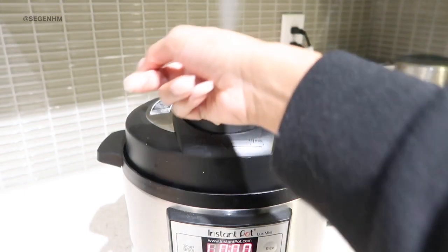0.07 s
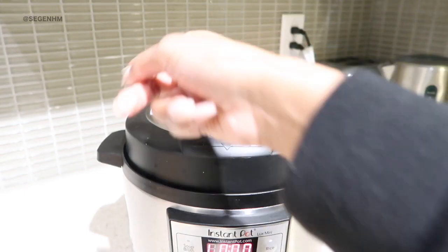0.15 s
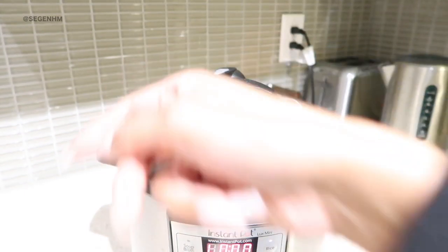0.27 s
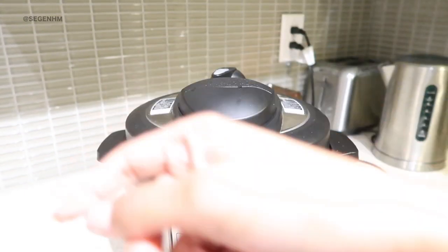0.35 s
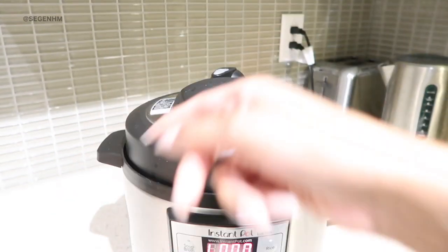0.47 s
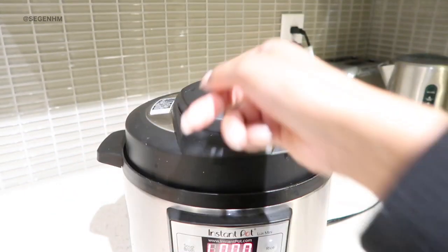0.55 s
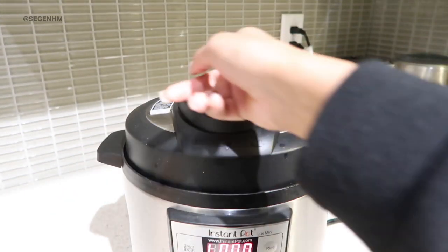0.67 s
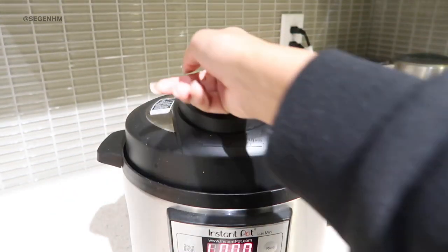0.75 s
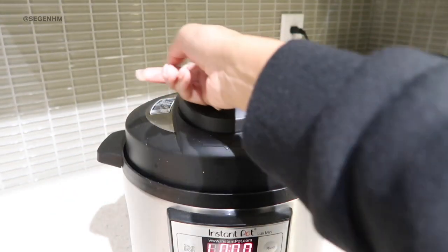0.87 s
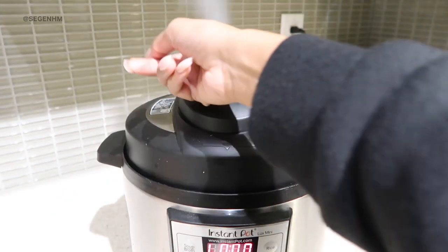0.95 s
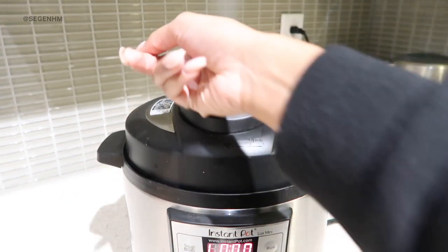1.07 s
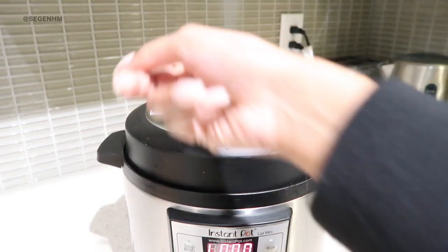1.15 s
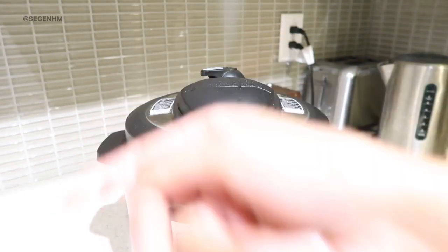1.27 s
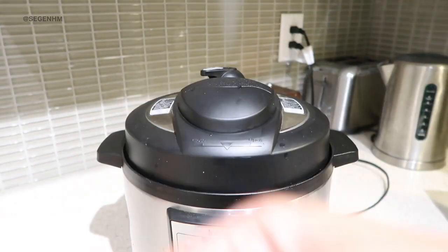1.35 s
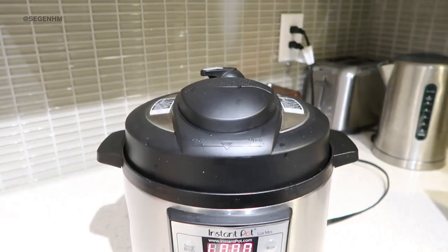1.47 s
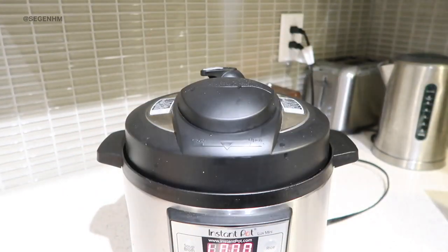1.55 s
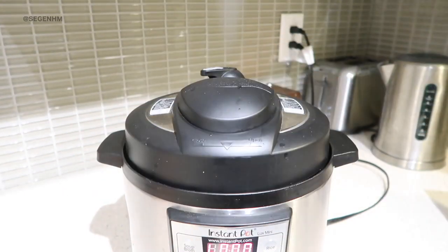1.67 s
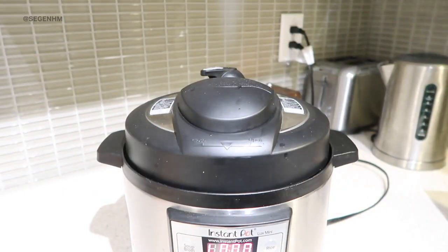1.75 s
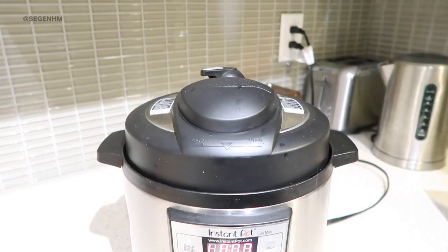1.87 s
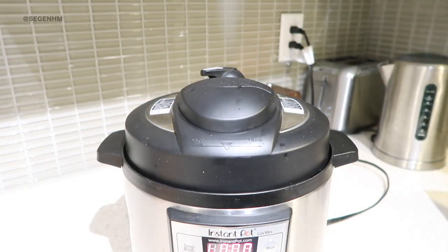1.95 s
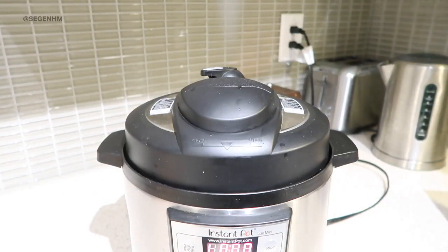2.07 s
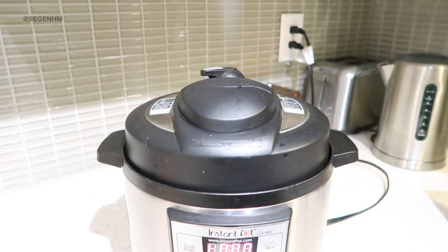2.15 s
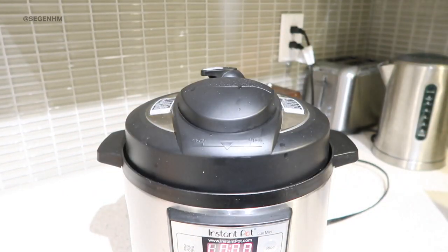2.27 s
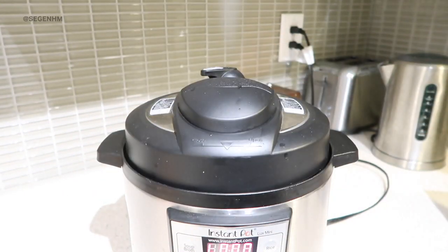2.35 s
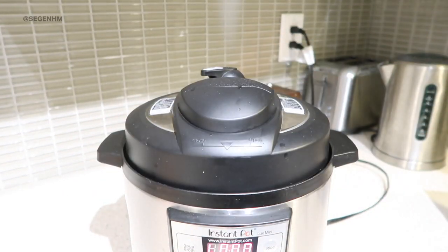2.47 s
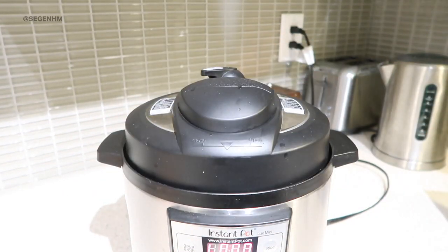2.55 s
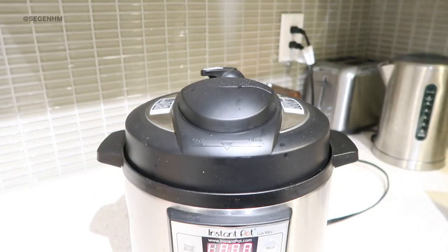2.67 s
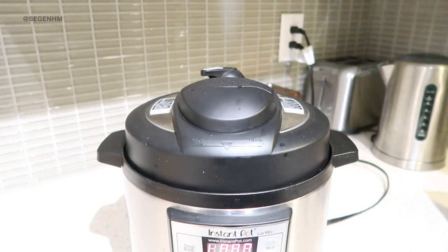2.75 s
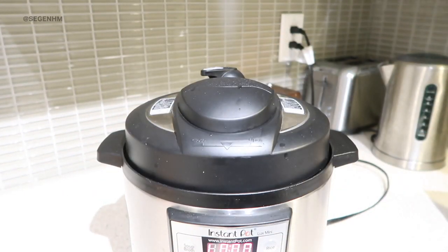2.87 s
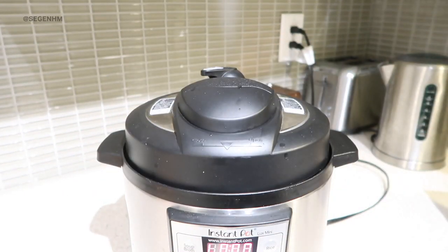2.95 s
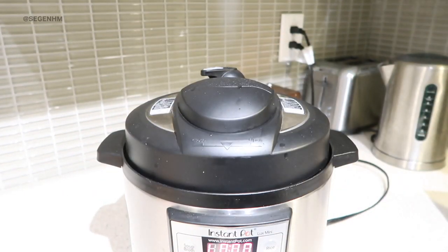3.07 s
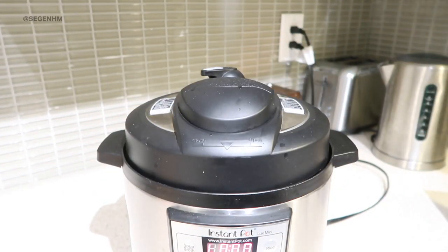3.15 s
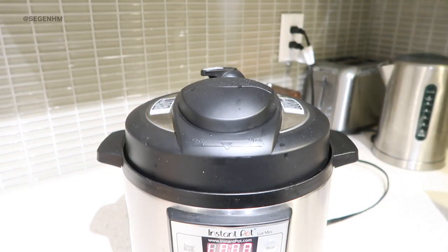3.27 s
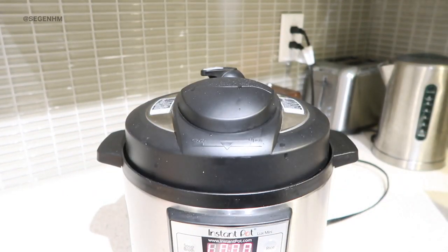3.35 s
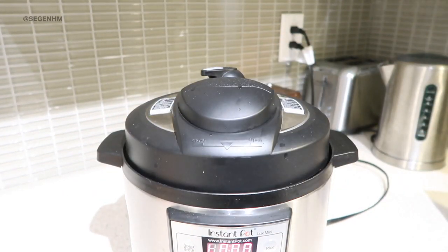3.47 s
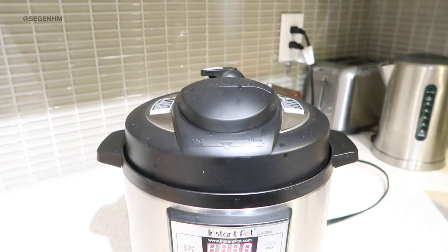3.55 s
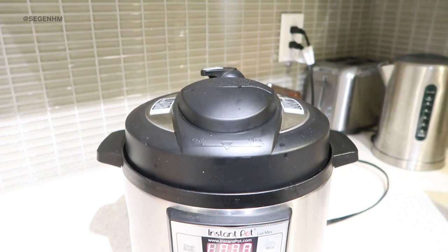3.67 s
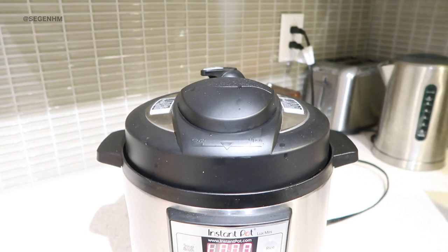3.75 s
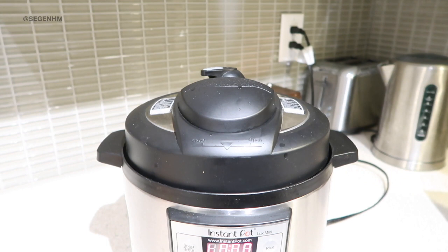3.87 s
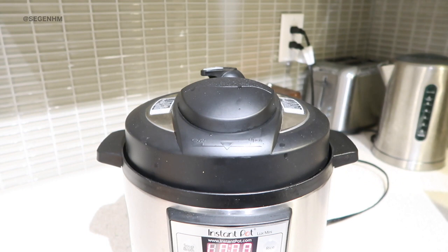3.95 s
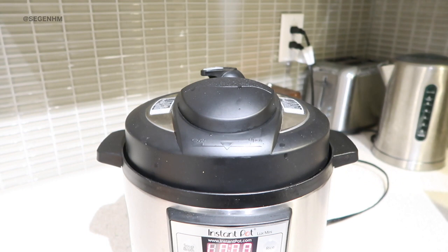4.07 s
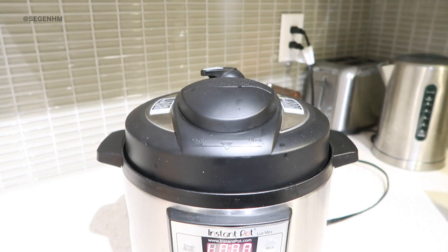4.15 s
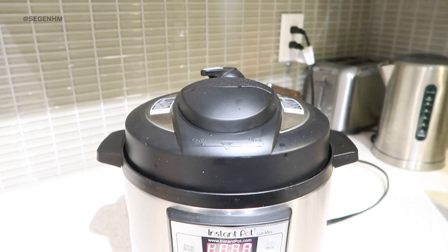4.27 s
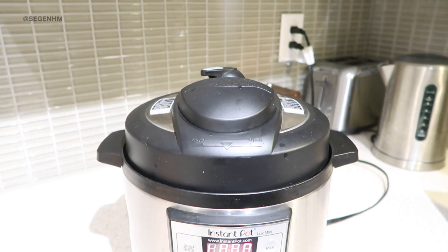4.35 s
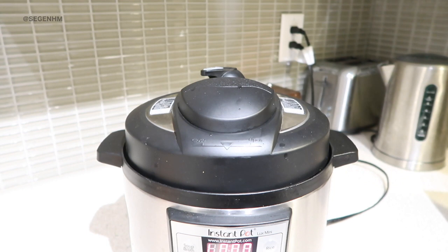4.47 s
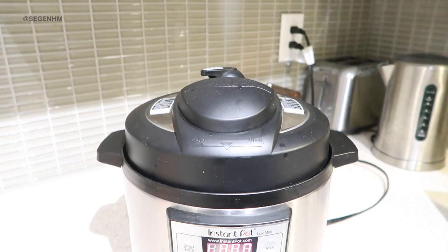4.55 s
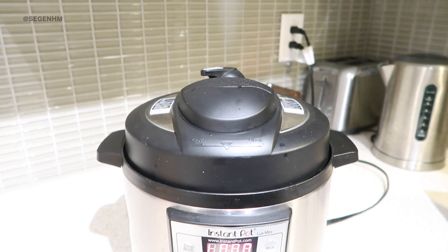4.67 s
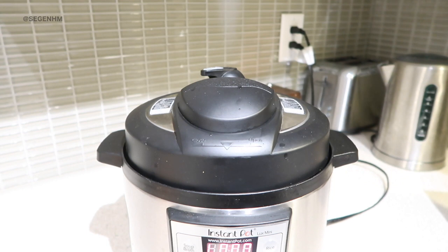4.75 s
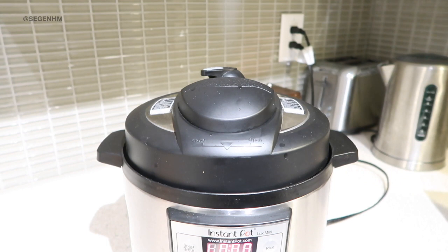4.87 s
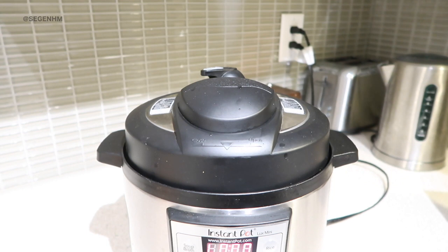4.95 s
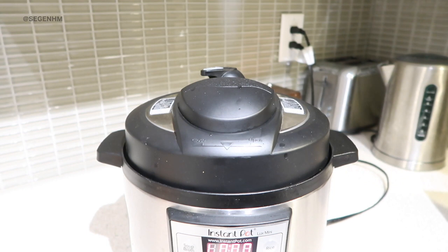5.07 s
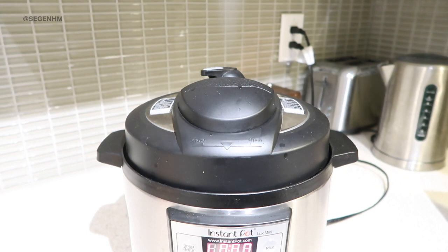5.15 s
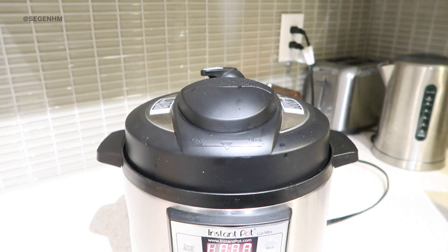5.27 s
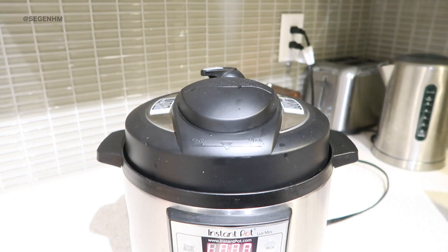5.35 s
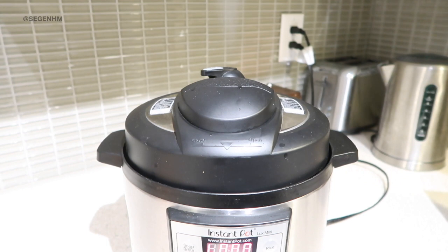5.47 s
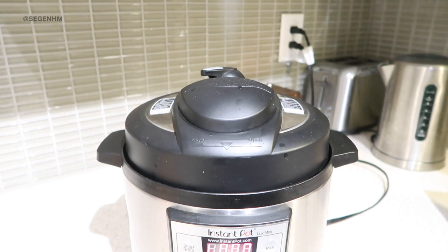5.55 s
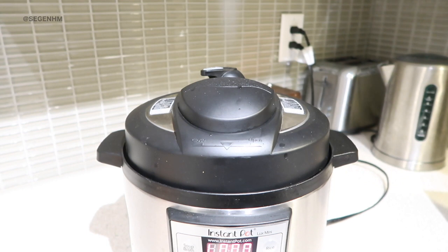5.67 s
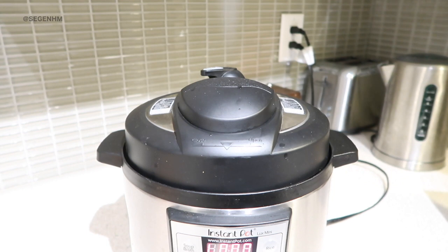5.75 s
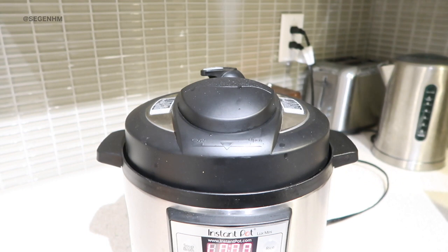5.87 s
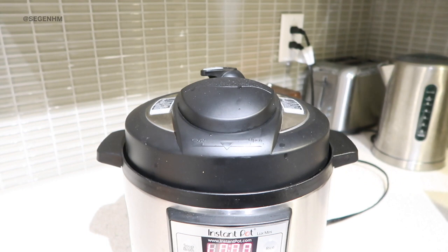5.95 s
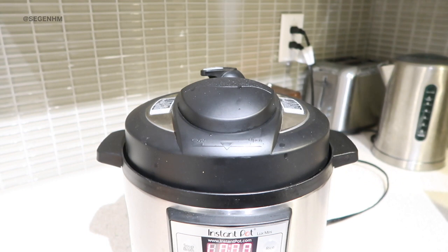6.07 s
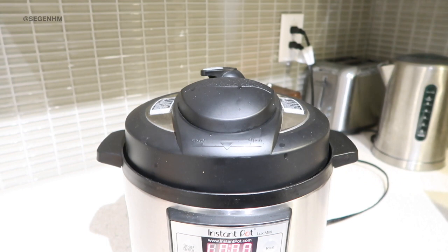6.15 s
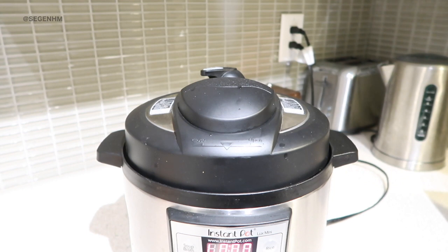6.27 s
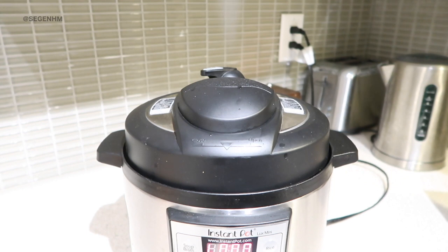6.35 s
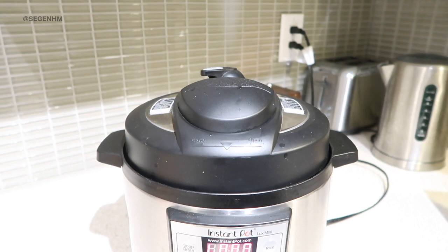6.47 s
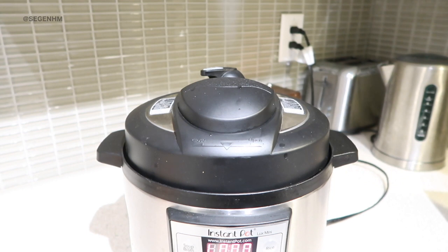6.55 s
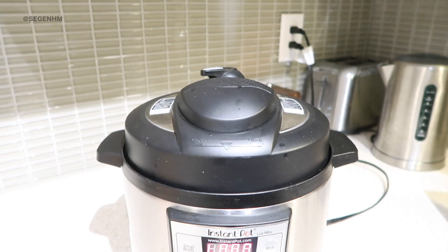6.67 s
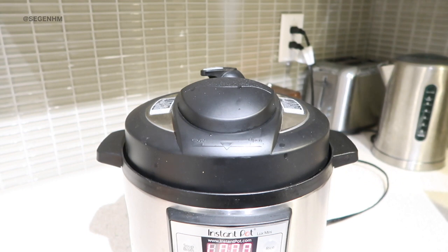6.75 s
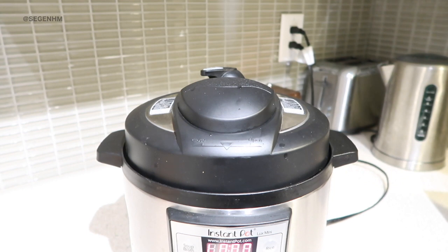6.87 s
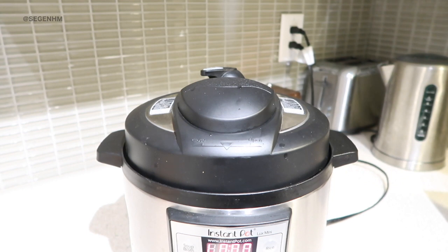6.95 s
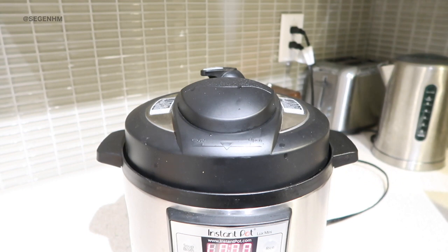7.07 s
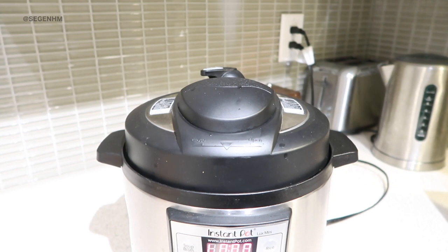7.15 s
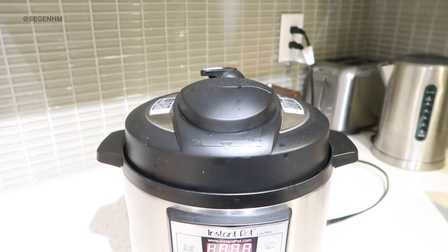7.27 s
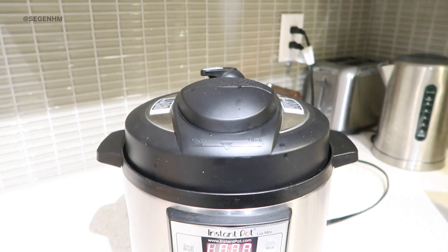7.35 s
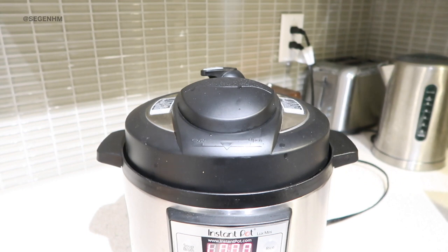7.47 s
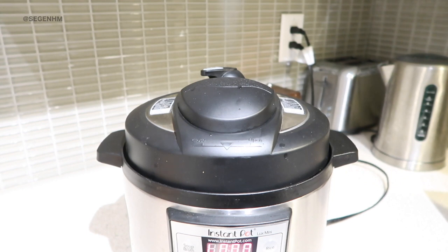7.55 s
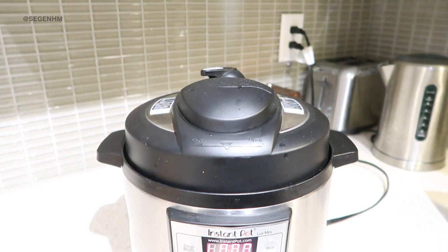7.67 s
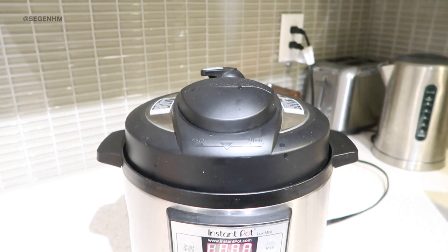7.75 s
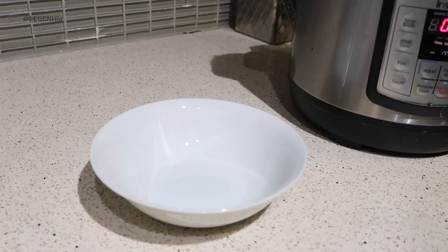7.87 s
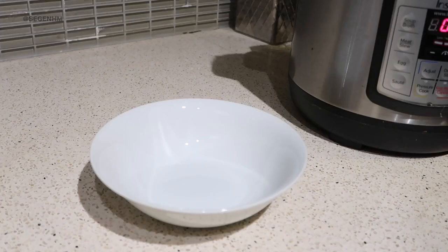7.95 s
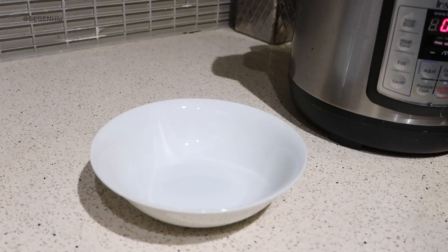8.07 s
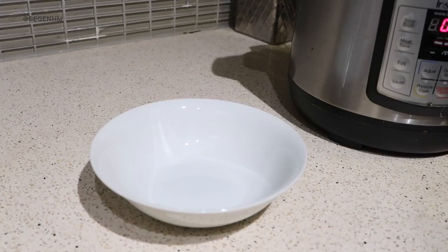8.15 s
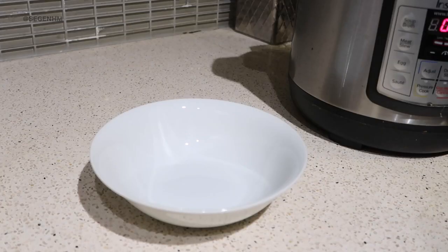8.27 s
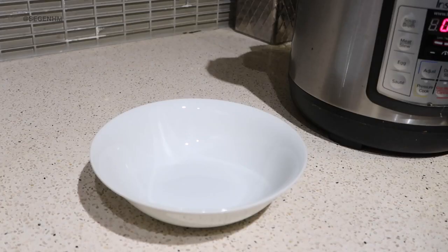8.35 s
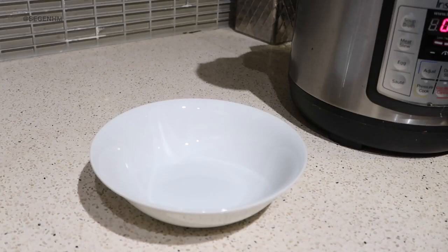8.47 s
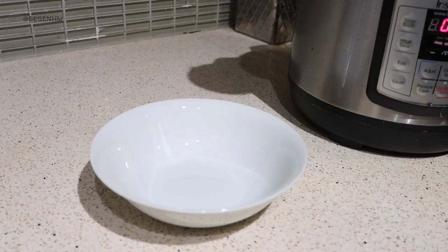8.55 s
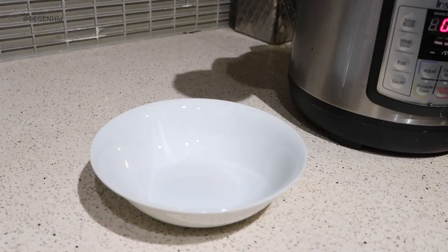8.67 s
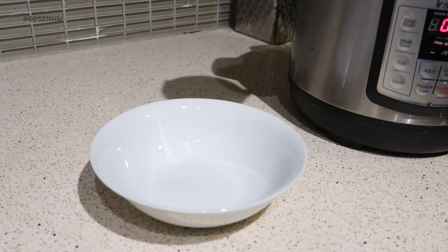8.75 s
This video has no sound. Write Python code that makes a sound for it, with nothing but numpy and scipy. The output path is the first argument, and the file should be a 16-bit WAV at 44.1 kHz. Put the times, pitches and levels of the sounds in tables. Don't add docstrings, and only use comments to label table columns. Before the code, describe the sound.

Close-up in a hard-surfaced kitchen: clicks and plastic taps, a short spluttering burst of steam falling shut, a small pause, then a hard clack and full pressure release. The jet sputters with condensed water at first, dries within moments and holds as a piercing, turbulent, evenly loud hiss for several seconds. It stops instantly at a scene change; low motor hum and faint room air remain.

```python
import sys
import numpy as np
from scipy import signal
from scipy.fft import rfft, irfft, next_fast_len
from scipy.io import wavfile

SR = 44100
rng = np.random.default_rng(int(sys.argv[2]) if len(sys.argv) > 2 else 0)


def undo_db(level):
    steps = np.asarray(level, float) / 20
    return 10 ** steps


def pcm_store(signal):
    levels = np.round(np.clip(np.atleast_2d(signal), -1, 1) * 32767)
    wavfile.write(sys.argv[1], SR, levels.astype(np.int16).T)


N = 388135
SCENE_CHANGE_S = 7.9063


def rms_one(x):
    return x / np.sqrt(np.mean(x ** 2) + 1e-20)


def white():
    return rfft(rng.standard_normal(next_fast_len(N)))


def coloured(noise, spectrum, peaks=(), peaks_db=0.):
    size = next_fast_len(N)
    hz = np.maximum(np.arange(len(noise)) * SR / size, 1)
    point_hz, point_db = np.transpose(spectrum)
    power = undo_db(2 * np.interp(np.log(hz), np.log(point_hz), point_db))
    for centre_hz, width_hz, db in peaks:
        hump = 1 / (1 + (2 * (hz - centre_hz) / width_hz) ** 2) ** 2
        power += undo_db(2 * (db + peaks_db)) * hump
    return rms_one(irfft(noise * np.sqrt(power), size)[:N])


def drift(rate_hz):
    r = np.exp(-80 * np.pi * rate_hz / SR)
    noise = rng.standard_normal(N // 40 + 2002)
    slow = signal.lfilter([1], [1, -2 * r, r * r], noise)[2000:]
    return np.interp(np.arange(N) / 40, np.arange(len(slow)), rms_one(slow))


def room_tone():
    # (frequency [Hz], density [dB per Hz])
    rumble_colour = [(22, -35), (38, -0.5), (54, -7.5), (80, -0.5), (141, -12), (172, -5), (220, -11),
                     (303, -13), (497, -28.5), (606, -28), (878, -33), (3590, -42), (12100, -59),
                     (13000, -55.5), (14000, -73)]
    # (frequency [Hz], density [dB per Hz])
    rumble_side_colour = [(35, -51), (60, -21.5), (178, -6.5), (381, -2.5), (679, -9), (1670, -15),
                          (3930, -19), (4410, -22.5), (15000, -38)]
    # (frequency [Hz], width [Hz], level [dB])
    motor_bands = [(86, 7.5, 3.5), (167, 18, -7.5), (300, 13, -21.5), (389, 35, -7.5)]
    # (frequency [Hz], density [dB per Hz])
    air_colour = [(2500, -20), (5000, 1), (11000, -8), (14500, -18), (15000, -39.5)]
    # (frequency [Hz], rms level [dB])
    whine_tones = [(13001, -90.5), (13028, -89)]
    rumble_db, rumble_side_db, air_db = -41.5, -56.5, -77.5

    t = np.arange(N) / SR
    whine = sum(np.sqrt(2) * undo_db(db) * np.sin(2 * np.pi * hz * t) for hz, db in whine_tones)
    rumble = undo_db(rumble_db + 0.3 * drift(5.7)) * coloured(white(), rumble_colour, motor_bands, peaks_db=-4.5)
    air = undo_db(air_db) * coloured(white(), air_colour) * (t > SCENE_CHANGE_S)
    rumble_side = undo_db(rumble_side_db) * coloured(white(), rumble_side_colour)
    return np.array([rumble + whine + air, rumble_side])


def knocks():
    # (time [s], peak level [dB], frequency [Hz], width [Hz], T60 [s])
    touches = [(.001, -37.5, 1340, 110, .25), (.002, -58.5, 3400, 250, 0.37), (.003, -47, 1111, 2500, 0.96),
               (.064, -29.5, 833.3, 1200, .12), (0.08, -15.5, 351, 700, .08), (0.248, -39, 1960, 220, 0.4),
               (0.089, -12, 4250, 252, 0.05), (0.091, -11.5, 5430, 391, 0.071),
               (0.103, -13, 1710, 150, 0.087), (.715, -60, 5130, 301, .05), (.865, -54, 1800, 500, .06),
               (.954, -34, 3200, 250, .05), (.952, -40, 1200, 2500, .1), (1.04, -23, 370, 92, 0.11),
               (1.065, -18, 1600, 120, .1), (0.9956, -6.5, 4200, 5000, .025), (0.994, -17, 370, 80, 0.14),
               (1.034, -15.5, 2200, 1507, 0.091), (1.09, -15.5, 7200, 2000, .06)]
    out, length = np.zeros(N), SR // 4
    t = np.arange(length) / SR
    attack = np.minimum(t / 0.0022, 1)
    noises = rng.standard_normal((len(touches), length))
    for (start_s, db, hz, width_hz, t60_s), noise in zip(touches, noises):
        r = np.exp(-np.pi * width_hz / SR)
        resonance = [1, 0, -1], [1, -2 * r * np.cos(2 * np.pi * hz / SR), r * r]
        body = signal.lfilter(*resonance, noise)
        body = signal.lfilter(*resonance, body)
        envelope = undo_db(db - 60 * t / max(t60_s, .004)) * attack
        out[round(start_s * SR):][:length] += envelope * rms_one(body)
    return out


def valve():
    # (time [s], hiss level [dB])
    puff = [(.05, -70.5), (.074, -48), (.084, -36.5), (.092, -20.5), (.19, -23.5), (.235, -30.5),
            (.265, -39.5), (.36, -55.5), (.48, -71.5)]
    # (time [s], hiss level [dB])
    release = [(.945, -72), (.968, -38), (.985, -36), (.995, -19), (1.01, -23.5), (1.096, -19), (1.22, -27),
               (1.45, -22.5), (1.85, -22)]
    # (first drops [s], full [s], blown clear from [s], level [dB])
    spits = [
        (0.06, .084, 0.084, -16),
        (0.949, 0.998, 1.085, -17),
    ]
    spit_rise_db, spit_clear_db_per_s = 36.5, 263
    mist_db = -17
    drip_db, drip_clear_db_per_s = -13.5, 27.5
    top_dry_db, top_wet_loss_db = -6, 20
    top_lag_s, top_drying_s = .02, .2
    top_weak_from_db, top_weak_share = -34.5, .9

    t = np.arange(N) / SR
    hiss_s, hiss_points_db = np.transpose(puff + release)
    hiss_db = np.interp(t, hiss_s, hiss_points_db)
    top_db = top_dry_db - top_weak_share * np.clip(top_weak_from_db - hiss_db, 0, 30)
    splutter = undo_db(hiss_db + mist_db)
    for first_s, full_s, clear_s, db in spits:
        rise_db = spit_rise_db * np.minimum((t - full_s) / (full_s - first_s), 0)
        fall_db = spit_clear_db_per_s * np.maximum(t - clear_s, 0)
        spit = undo_db(db + np.maximum(rise_db - fall_db, -90)) * (t > first_s)
        since_s = np.maximum(t - full_s, 0)
        drips_db = hiss_db - hiss_db.max() + db + drip_db - drip_clear_db_per_s * since_s
        splutter = splutter + spit + undo_db(drips_db) * (t > full_s)
        wetness = (1 - np.exp(-since_s / top_lag_s)) * np.exp(-since_s / top_drying_s)
        top_db = top_db - top_wet_loss_db * wetness
    return hiss_db, top_db, splutter


def jet():
    # (frequency [Hz], density [dB per Hz])
    hiss_colour = [(240, -53), (450, -32), (760, -19.5), (1100, -23), (1500, -13.5), (2060, -1.5),
                   (2700, -9.5), (4300, -9), (5200, -0.5), (5900, -8), (10700, -15), (13300, -11),
                   (14800, -16), (15200, -29), (16000, -30)]
    # (frequency [Hz], density [dB per Hz])
    hiss_side_colour = [(300, -31.5), (1500, -24.5), (2000, -10.5), (2700, -20), (3500, -37), (4300, -4),
                        (5000, 3), (5500, -2.5), (6000, -6.5), (8200, -5.5), (8800, -8), (13300, -5.5),
                        (14300, -7.5), (15200, -21.5), (16000, -29.5)]
    # (frequency [Hz], width [Hz], level [dB])
    vent_peaks = [(1600, 50, -9), (1738, 40, -7), (1848, 40, -7), (1956, 35, -2), (2015, 30, -2),
                  (2127, 35, 1), (2430, 45, -4), (3260, 90, -11), (3760, 45, -9), (4225, 60, -7),
                  (4627, 55, -3), (4785, 55, -3), (4941, 50, -3), (5085, 55, 0), (5170, 40, -5),
                  (5274, 50, -1), (5469, 70, 0), (5560, 45, -5), (5794, 50, -7), (6075, 45, -4),
                  (6440, 45, -9), (6770, 50, -10), (7320, 80, -6), (7860, 60, -9), (8300, 80, -13),
                  (8900, 65, -13), (9810, 120, -16), (12900, 70, -13), (13089, 60, -10), (13445, 90, -12)]
    # (frequency [Hz], width [Hz], level [dB])
    side_peaks = [(2000, 90, 0), (5025, 90, 1), (5490, 140, 8), (6190, 120, 3.5), (6730, 70, -5),
                  (8780, 80, 1), (13235, 80, 3)]
    # (frequency [Hz], density [dB per Hz])
    splutter_colour = [(88, -41.5), (150, -12.5), (361, -3.5), (476, -7.5), (1310, -4), (1780, -0.5),
                       (2840, -18.5), (3170, -10.5), (4000, -2), (5200, -36.5), (8800, -120)]
    top_split_hz, hiss_side_db = 12200, -6.5
    port_share, port_turn_rad, port_fade_hz = .8, -1.75, 7500

    hiss_db, top_db, splutter = valve()
    flutter = undo_db(0.32 * drift(5.1) + .5 * drift(40.))
    lift = undo_db(top_db + 7 + .3 * drift(6.0))
    near = white()
    hz = np.linspace(0, SR / 2, len(near))
    share = port_share / (1 + (hz / port_fade_hz) ** 4)
    apart = np.sqrt(share) * np.exp(1j * port_turn_rad) * near + np.sqrt(1 - share) * white()
    hiss = coloured(near, hiss_colour, vent_peaks, peaks_db=4.5)
    hiss_side = undo_db(hiss_side_db) * coloured(apart, hiss_side_colour, side_peaks)
    noises = np.array([hiss, hiss_side])
    body = signal.sosfilt(signal.butter(4, top_split_hz, "low", fs=SR, output="sos"), noises)
    top = signal.sosfilt(signal.butter(4, top_split_hz, "high", fs=SR, output="sos"), noises)
    mid, side = undo_db(hiss_db + 1.82) * flutter * (body + lift * top)
    spray = undo_db(-4.5 + 2.95 * drift(30.)) * coloured(white(), splutter_colour)
    return np.array([mid + splutter * spray, side])


def reflections(x):
    early_t60_s, early_db, early_from_hz = 0.071, -4, 9500
    kitchen_t60_s, kitchen_db, kitchen_dull_hz = 0.58, -13, 3760
    t = np.arange(SR // 2) / SR
    early, late = rng.standard_normal((2, len(t)))
    early = early * undo_db(-60 * t / early_t60_s) * (t > .001)
    late = late * undo_db(-60 * t / kitchen_t60_s) * (t > .008)
    early, late = early / np.linalg.norm(early), late / np.linalg.norm(late)
    early = signal.lfilter(*signal.butter(2, early_from_hz, "high", fs=SR), early)
    late = signal.lfilter(*signal.butter(3, kitchen_dull_hz, fs=SR), late)
    return signal.fftconvolve(x, undo_db(early_db) * early + undo_db(kitchen_db) * late)[:N]


def scene():
    mid, side = jet()
    mid = mid + knocks()
    cooker = np.array([mid + reflections(mid), side + reflections(side)])
    cooker = cooker * np.clip((SCENE_CHANGE_S - np.arange(N) / SR) / .0004, 0, 1)
    mid, side = cooker + room_tone()
    return np.array([mid + side, mid - side])


def low_pass(x):
    return signal.sosfilt(signal.butter(12, 15760, fs=SR, output="sos"), x)


def record(dry):
    mix = 1.2 * np.tanh(dry / 1.2)
    return low_pass(mix)


dry = scene()
out = record(dry)
pcm_store(out)
```